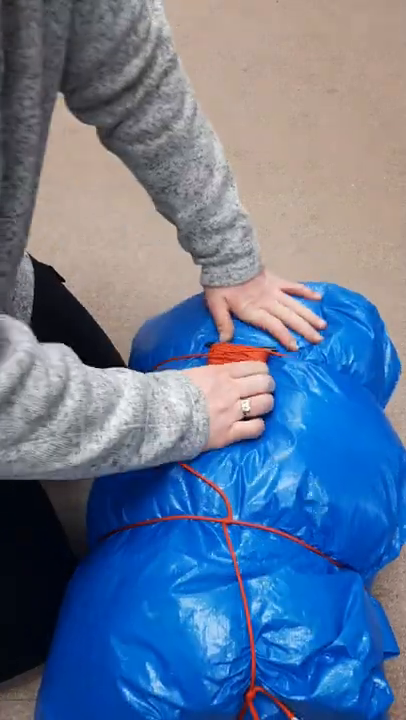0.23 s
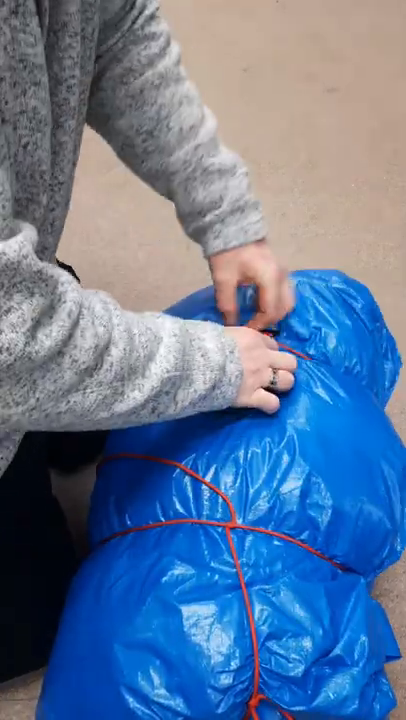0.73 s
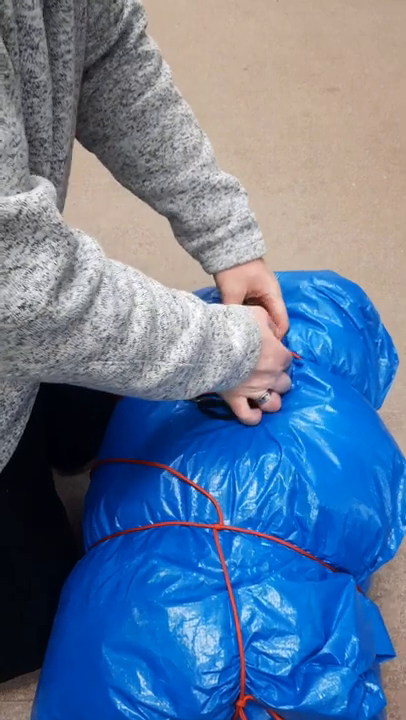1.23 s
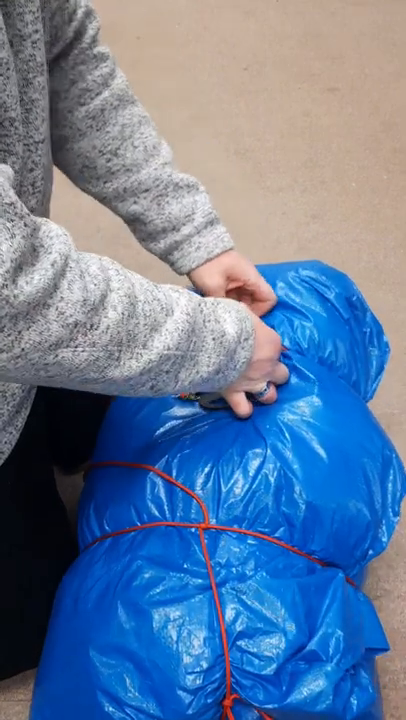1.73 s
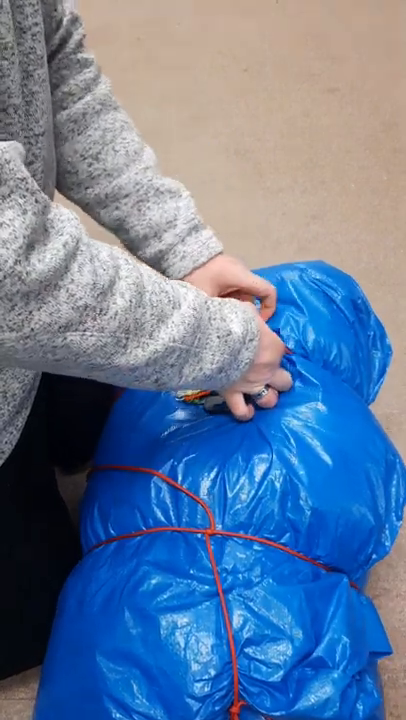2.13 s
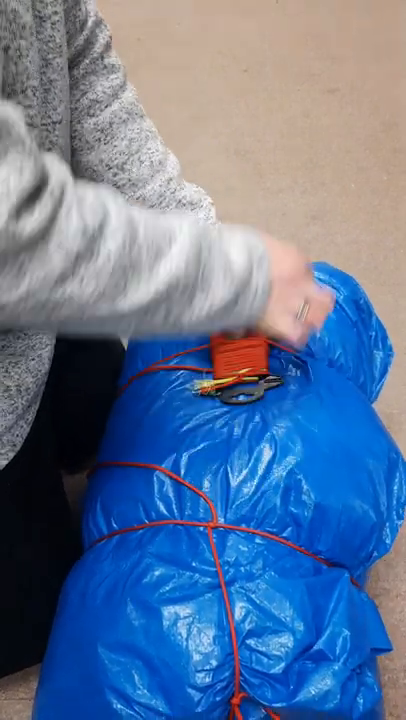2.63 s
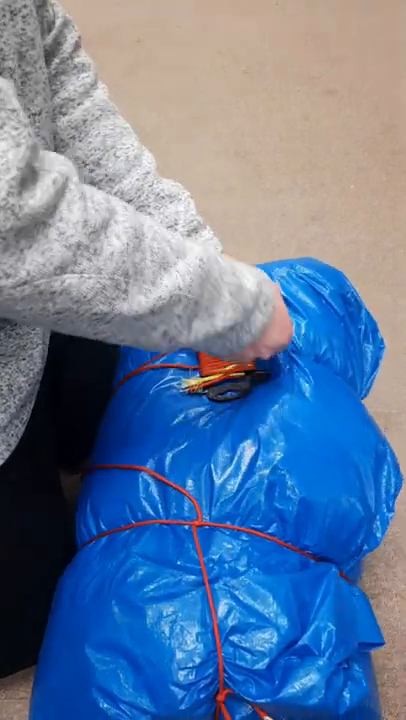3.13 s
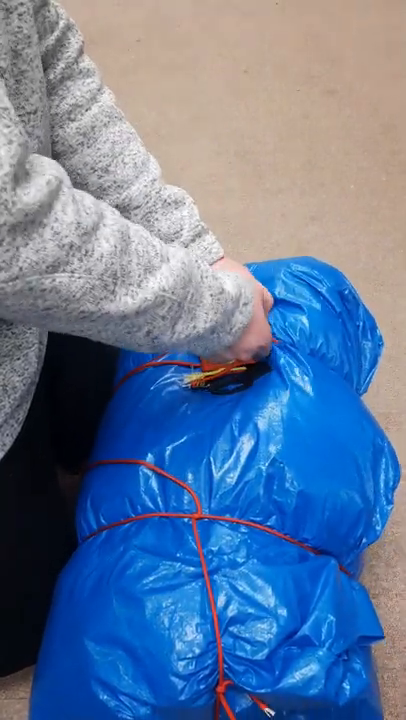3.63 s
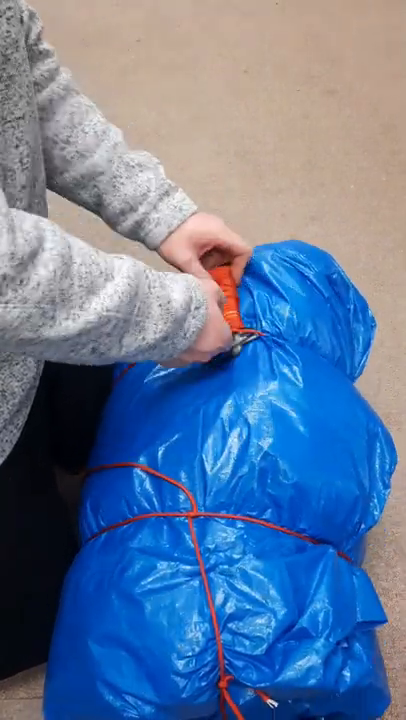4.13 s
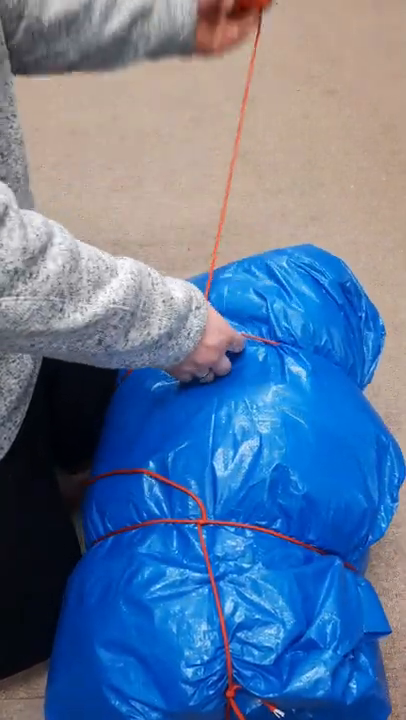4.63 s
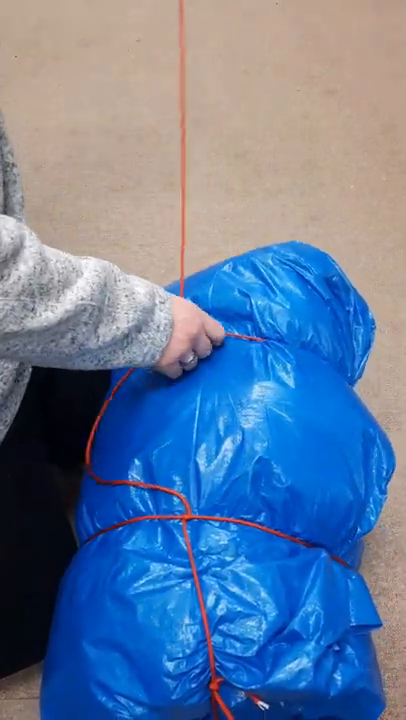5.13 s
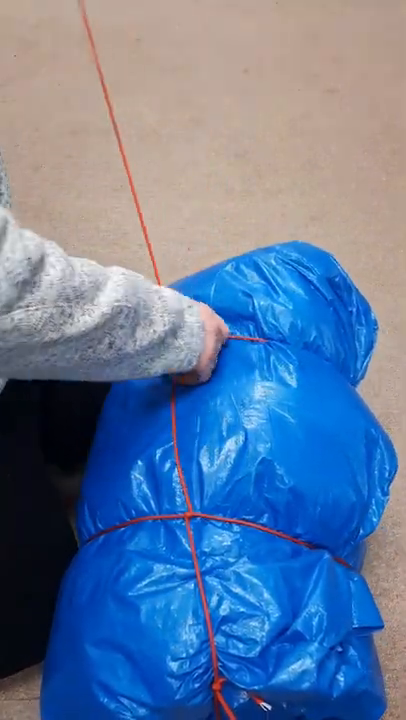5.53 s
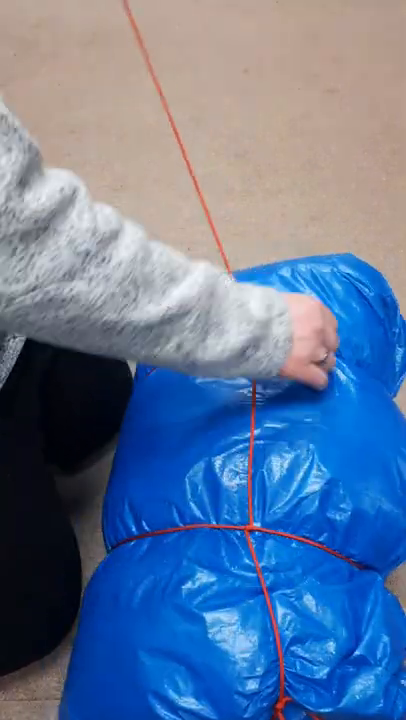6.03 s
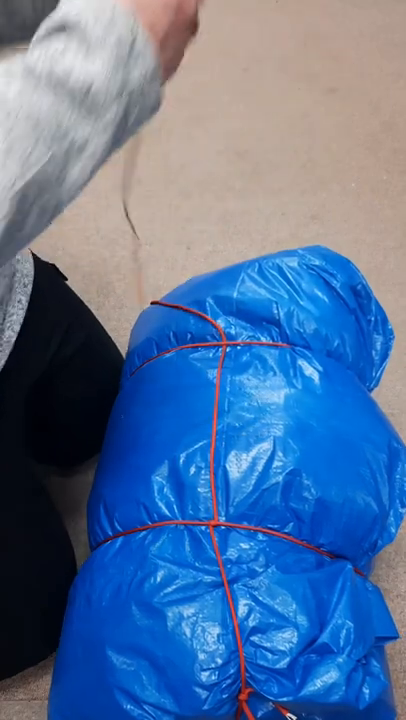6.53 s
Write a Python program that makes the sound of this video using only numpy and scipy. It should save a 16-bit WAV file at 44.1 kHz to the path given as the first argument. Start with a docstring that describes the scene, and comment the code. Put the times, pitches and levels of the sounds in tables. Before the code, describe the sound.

A quiet, slightly reverberant room with low, steady ventilation rumble. Very close, a little left, plastic tarp crackles at once, brisk and dense until about 0.4 s, with sharp crease snaps. Rustling continues in short bursts from 0.5 to 1.5 s, with small dull knocks near 0.7 and 1.0, then grows lighter. A crisp snap comes at 1.7, more crinkles follow, and a heavy, hollow, slack-drum thump booms at 2.6. Sparse, softer crackles run from 2.9 to 4.0. At 4.1-4.2 three fast, loud slapping thumps and snaps hit, the rumble dipping slightly afterwards. Cord then slides from 4.3, hissing with a breathy whistle that rises, peaks around 4.55, drops and wavers, fading by 5.3. Faint hiss lingers to 5.9, with tiny clicks, a soft thump and crinkle at 6.0, near quiet, and a light tap at 6.7.

```python
"""Quiet room, two microphone ports close to a stuffed bundle of plastic tarp on the floor, the left one nearer.
From the start hands tie a cord round it: the sheet crackles in clumps of tiny clicks and snaps at its creases.
A cord winder and the jerking cord thump it like a slack drum, its modes ringing, loudest past two and four seconds.
Then the cord slides out through a loop with a hiss and a noisy whistle; a few small moves and blows follow.
Ventilation, a shaped noise, rumbles below throughout; the recorder's gain control turns it down after loud blows."""
import sys
import numpy as np
from scipy import signal
from scipy.fft import rfft, irfft, next_fast_len
from scipy.io import wavfile
from scipy.ndimage import uniform_filter1d, map_coordinates

SR = 44100
rng = np.random.default_rng(int(sys.argv[2]) if len(sys.argv) > 2 else 0)


def put_to_file(sound):
    """Save the sound as 16-bit audio at rate SR, in the file named by the first command-line argument."""
    columns = np.atleast_2d(sound).T  # one column per channel
    safe = np.clip(columns, -1, 1)
    whole_steps = np.round(safe * 32767)
    wavfile.write(sys.argv[1], SR, whole_steps.astype(np.int16))


N = 298541


def from_db(db):
    """dB to gain."""
    return 10 ** (np.asarray(db) / 20)


def rms_one(x):
    """Scaled to rms 1."""
    return x / np.sqrt(np.mean(x ** 2) + 1e-20)


def in_time(rows):
    """Curve columns read at every sample."""
    s, *columns = np.vstack(rows).T
    return [np.interp(np.arange(N) / SR, s, c) for c in columns]


def at_hz(points, hz):
    """Spectrum read on a log-frequency axis."""
    point_hz, value = np.array(points).T
    return np.interp(np.log(hz), np.log(point_hz), value)


def butter(order, hz, kind, x):
    """Low- or high-pass with a maximally flat passband."""
    return signal.sosfilt(signal.butter(order, hz, kind, fs=SR, output="sos"), x)


def drift(rate_hz):
    """Slow random wander of spread 1, drawn at every 40th sample."""
    r = np.exp(-80 * np.pi * rate_hz / SR)
    noise = rng.standard_normal(N // 40 + 2002)
    slow = signal.lfilter([1], [1, -2 * r, r * r], noise)[2000:]      # the filter has settled by then
    return np.interp(np.arange(N) / 40, np.arange(len(slow)), rms_one(slow))


def resonance(x, hz, width_hz):
    """Two-pole peak, gain 1 on top."""
    r = np.exp(-np.pi * width_hz / SR)
    zeros = np.array([1, 0, -1]) * (1 - r * r) / 2
    return signal.lfilter(zeros, [1, -2 * r * np.cos(2 * np.pi * hz / SR), r * r], x)


def ring(force, hz, t60):
    """A unit click sets a sine of height 1 ringing."""
    r, w = from_db(-60 / (t60 * SR)), 2 * np.pi * hz / SR
    return signal.lfilter([0, np.sin(w)], [1, -2 * r * np.cos(w), r * r], force + 1e-18)


# Moves of the hands on the sheet, close to the ports. Each row: start in seconds, length in seconds,
# nominal crackle level in dB, swell over the move in dB, then crispness, pressure on the bundle and treble,
# each in dB relative to the crackle.
HAND_MOVES = [(0.0, 0.0061, -50, -2, -3.5, 3, -3), (0.05, 0.13, -37.5, 2, -3.5, -7, -13),
              (0.229, 0.18, -40, -9, -4, -0.5, -12), (0.525, .2, -49, 6.5, -5.5, 2, -10.5),
              (0.797, 0.28, -44.5, -13, -4.5, -2, -12), (1.06, 0.026, -40, -6.5, -6.5, -8, -11),
              (1.12, .08, -47.5, -5, -3.5, -1, -17), (1.19, 0.28, -53, -2.5, -7, -0.5, -13.5),
              (1.513, 0.066, -56.5, -3, -2.5, 7.5, -4), (1.638, .1, -53.5, -0.5, -5.5, 1, -9),
              (1.76, 0.11, -52, 4.5, -9.5, -4, -7.5), (1.935, 0.082, -55, -1, -7, 8.5, -10.5),
              (2.032, 0.0095, -48, -1, -33, 7.5, -22), (2.068, .11, -53, 2, -13, 0.5, -18),
              (2.206, 0.035, -50, 2.5, -4.5, 2.5, -10), (2.309, 0.31, -54, 10.5, -3.5, 3, -8.5),
              (2.909, 0.055, -58, 8.5, -5.5, -3, -6), (3.058, 0.011, -46, -13.5, -3, -1, -10),
              (3.105, 0.012, -40, -17, -1, -8, -2.5), (3.23, 0.028, -51, -12, -2, -13, -13),
              (3.341, 0.1, -71, 8, -7.5, -2, -16), (3.492, 0.15, -61, 8.5, -8, -0.5, -16),
              (3.691, 0.14, -68.5, 0.5, -5, 9, -8), (3.835, 0.015, -47, 1, -4, -6, -14),
              (3.82, 0.21, -53, -1.5, -3.5, -1, -9), (4.079, 0.084, -47.5, 2.5, 0, -10.5, -4),
              (4.214, .1, -39, -4, -4, 2, -6), (4.35, 0.048, -41, -6.5, -8.5, 2, -5),
              (5.44, 0.055, -71, 1.5, 5, 17, 1), (5.612, 0.17, -61.5, 1.5, 1.5, 7, -6),
              (5.906, 0.071, -70, 16.5, 8.5, 13, 3), (6.005, 0.016, -48.5, -1, 0, 11, 1.5),
              (6.082, 0.053, -64.5, -7, -6, 4, -5), (6.612, .08, -73, 3, 0.5, 17, 6),
              (6.697, 0.05, -48, -12.5, -2.5, -11, -5)]
# The cord sliding over the sheet. Each row: time in seconds, nominal hiss level in dB.
CORD_SLIDE = [(4.3, -57), (4.44, -47.5), (4.56, -52), (4.66, -54), (4.8, -60.5), (4.87, -56.5),
              (5.1, -56.5), (5.3, -63), (5.5, -59), (5.6, -62), (5.78, -65.5), (5.88, -69)]
# The sheet under the sliding cord, and at rest. Each holds: crispness, treble and pressure in dB relative
# to the crackle, smooth share from 0 to 1.
UNDER_CORD = (2, -4, 1, 0.73)
AT_REST = (-0.5, 1.5, 20, 0.9)
REST_DB = -79
ATTACK_SHARE = 0.34   # a move swells in over this share of its length, half of it before the start
MOVE_RELEASE_DB_PER_S, MOVE_SMOOTH = 301, 0.22   # fade after a move; smooth share 0-1


def handling():
    """Moves, sliding cord and resting sheet add in power: crackle, crispness, treble, smooth share, pressure."""
    t = np.arange(N) / SR
    powers = 0
    for s, length, db, swell_db, crisp_db, press_db, treble_db in HAND_MOVES:
        swell = swell_db * np.clip((t - s) / length, 0, 1)
        release = MOVE_RELEASE_DB_PER_S * np.maximum(t - s - length, 0)
        attack = np.clip((t - s) / (ATTACK_SHARE * length) + 0.5, 0, 1)
        power = (attack * from_db(db + swell - release)) ** 2
        shares = [1, *from_db([crisp_db, treble_db, press_db]) ** 2, MOVE_SMOOTH]
        powers = powers + np.outer(shares, power)
    first, last = CORD_SLIDE[0][0], CORD_SLIDE[-1][0]
    on = np.interp(t, [first - 0.06, first, last, last + 0.06], [0, 1, 1, 0])
    sliding_gain = on * from_db(*in_time(CORD_SLIDE))
    resting_gain = from_db(REST_DB) * np.ones(N)
    for gain, (*rel_db, smooth) in ((sliding_gain, UNDER_CORD), (resting_gain, AT_REST)):
        powers = powers + np.outer([1, *from_db(rel_db) ** 2, smooth], gain ** 2)
    level_db, crisp_db, treble_db, pressure_db = 10 * np.log10(powers[:4])
    smooth_share = powers[4] / powers[0]
    return level_db, crisp_db - level_db, treble_db - level_db, smooth_share, pressure_db


# Colour of the tarp heard close by, relative within each of three bands (up to 2800, to 7500, above).
# Each row: frequency in Hz, weight in dB.
TARP_COLOUR = [(290, -31), (500, 7), (621, 9), (688, 1), (906, 6.5), (1030, 4.5), (2810, -0.5), (4530, 4.5),
               (9360, -64), (15100, -33), (16000, -32)]
GRAINS_PER_S = 1200   # nominal; the clumps thicken and thin it


def crackle(level_db, crisp_db, treble_db, sliding):
    """Tiny creases click in clumps over a sliding hiss; each patch of sheet has its pitch, each click its place."""
    sizes = from_db(2.34 * np.minimum(rng.exponential(1, N), 3.3)) * rng.choice([-1, 1], N)
    clumps = drift(30)
    struck = rng.random(N) < GRAINS_PER_S * from_db(4.0 * clumps) / SR
    clicks = rms_one(sizes * struck)
    pitches = np.geomspace(500, 15000, 14)
    dealt = rng.integers(0, len(pitches), N)      # which patch each click falls on
    hiss = rng.standard_normal((4, N)) * from_db(1.6 * clumps)
    smooth = np.clip(sliding, 0, 1)
    clicks = np.sqrt(len(pitches) * (1 - smooth)) * clicks
    hiss = np.sqrt(smooth) * hiss
    place, bands = rng.choice([-1, 1], N), np.zeros((3, 2, N))
    for k, hz in enumerate(pitches):
        wide = np.clip(0.45 * (hz / 4000) ** 0.61, 0, 0.9)      # short waves reach the two ports less alike
        own = clicks * (dealt == k) * min(1, (3500 / hz) ** 0.77)      # the treble is more slide than click
        both = own + hiss[k % 2]
        apart = own * place + hiss[2 + k % 2]
        stereo = np.sqrt(1 - wide) * both + np.sqrt(wide) * apart * [[1], [-1]]
        patch = resonance(stereo, hz, 0.32 * hz)
        # steeper skirts: a small crease sounds in a narrow band
        patch = resonance(patch, hz, min(2.4 * hz, 9000))
        bands[np.searchsorted([2800, 7500], hz)] += from_db(at_hz(TARP_COLOUR, hz)) * patch
    crisp = butter(1, 2000, "high", bands[1])
    top = butter(2, 6000, "high", bands[2])
    thin_creases = from_db(crisp_db + 5.5) * rms_one(crisp) + from_db(treble_db + 4) * rms_one(top)
    return from_db(level_db - 2.5) * (1.86 * rms_one(bands[0]) + thin_creases)


# Single creases snapping over, close to the ports. Each row: time in seconds, peak of the body in dB
# before panning, centre in Hz, bright edge in dB relative to the body's peak.
CREASE_SNAPS = [(0.0593, -18.5, 1610, -24), (0.0665, -21, 3540, -28), (0.086, -17, 1750, -17),
                (0.114, -19.5, 1930, -14), (0.171, -20.5, 1710, -11), (0.1987, -23, 2930, -24),
                (0.2633, -39, 3690, -13), (0.2926, -30, 1530, -20), (0.3152, -29, 1680, -13),
                (0.4277, -30.5, 2030, -27), (0.5495, -34, 1890, -18), (0.6856, -33, 2230, -12),
                (0.71, -29, 1750, -12), (0.8257, -32, 2410, -14), (0.845, -29, 3500, -17),
                (0.865, -31, 1400, -20), (0.9095, -31.5, 2300, -20), (1.0678, -30.5, 1750, -15),
                (1.0868, -23, 2740, -20), (1.1275, -31, 2740, -20), (1.1893, -36, 4750, -14),
                (1.3188, -32, 1550, -23), (1.4271, -38.5, 2000, -21), (1.5163, -41.5, 1500, -8),
                (1.5299, -34, 8160, -10), (1.562, -32, 5740, -13), (1.643, -37, 3150, -15),
                (1.6658, -29.5, 2440, -22), (1.7158, -18, 2480, -25), (1.734, -27, 2050, -24),
                (1.777, -30, 1690, -16), (1.82, -26, 3900, -12), (1.904, -28, 4900, -11),
                (2.0336, -32, 1470, -21), (2.077, -47, 1280, -28), (2.13, -40, 1280, -18),
                (2.2228, -36.5, 2500, -19), (2.3087, -40, 2220, -20), (2.362, -43, 3110, -17),
                (2.4, -40, 1560, -7), (2.4326, -25, 2490, -19), (2.4699, -31, 2710, -12),
                (2.5052, -33, 1760, -16), (2.5717, -45, 1900, -6), (2.615, -17, 1430, -26),
                (2.9017, -46, 1580, -16), (2.972, -33.5, 2430, -22), (3.045, -32.5, 2200, -22),
                (3.0909, -41, 1680, -3), (3.106, -29.5, 1780, -18), (3.2312, -35, 2250, -14),
                (3.3397, -47, 1530, -21), (3.616, -45, 1690, -14), (3.6243, -38, 1330, -12),
                (3.642, -35.5, 6500, -3), (3.814, -41, 2190, -12), (3.839, -31, 2200, -18),
                (3.8763, -35, 4300, -17), (3.902, -29.5, 3900, -11), (3.9872, -40, 2120, -19),
                (4.0808, -28, 1500, -16), (4.148, -13.5, 1350, -20), (4.2208, -9.5, 1890, -26),
                (5.3779, -27.5, 4070, -21), (5.4635, -33, 5200, -10), (5.487, -37, 3500, -20),
                (5.937, -37, 5070, -5), (5.9752, -26, 4470, -16), (6.0139, -27.5, 3100, -18),
                (6.097, -41, 1590, -21), (6.694, -47, 4210, -18)]
SNAP_PAN_DB, SNAP_SCATTER_DB = 4.5, 3   # left over right, and its spread


def snaps():
    """A sharp click coloured by the crease with a bright edge, then a short noisy tail."""
    length = 2000
    out, t = np.zeros((2, N + length)), np.arange(length) / SR
    tails = rng.standard_normal((len(CREASE_SNAPS), 2, length))
    pans_db = SNAP_PAN_DB + SNAP_SCATTER_DB * tails[:, 0, 0]
    for (s, db, hz, edge_db), noise, pan_db in zip(CREASE_SNAPS, tails, pans_db):
        force = 0.13 * noise * from_db(-60 * t / 0.025)
        force[:, 0] = 1
        body = resonance(resonance(force, hz, 0.65 * hz), hz, 1.8 * hz)
        edge = butter(2, 5000, "high", force * from_db(-60 * t / 0.0081))
        snap = body / np.abs(body).max() + from_db(edge_db) * edge
        at = round(s * SR)
        out[:, at:at + length] += snap * from_db(db + pan_db / 2 * np.array([[1], [-1]]))
    return out[:, :N]


# Blows on the bundle, close to the ports. Each row: time in seconds, nominal slap in dB, nominal thump in dB,
# lowest modes in dB relative to the thump, upper modes in dB relative to the thump.
BUNDLE_BLOWS = [(0.685, -24, -35.5, 4, 9.5), (1.006, -21.5, -28.5, -31, 9), (1.089, -22, -31.5, -22, -21),
                (1.904, -42, -32.5, -26, 8), (2.399, -19, -40.5, -15, 14), (2.615, -18, -3, -2, 2.5),
                (2.731, -62, -20, -2, -18), (3.106, -51, -42.5, -8, -1), (3.835, -29, -40.5, -4.5, 13),
                (4.0804, -16.5, -15, -9.5, 3), (4.147, -8, -11, -12.5, 3.5), (4.2193, -5, -7, -10.5, 0.5),
                (5.644, -59, -34.5, -16, 0), (6.013, -24.5, -25.5, 1.5, -18), (6.099, -36, -39.5, 3, -6),
                (6.695, -36.5, -39.5, -23, 18.5)]
# Modes of the bundle and the air in it. Each row: frequency in Hz, relative level in dB,
# time to fall 60 dB after a blow in seconds.
BUNDLE_MODES = [(84, -8.5, 0.16), (115, -0.5, 0.096), (152.8, -11.5, 0.38), (195, -1.5, 0.15),
                (260.3, -16, 0.36), (321.8, 0, 0.14), (357.3, -12.5, 0.24), (395.3, -5.5, 0.12),
                (428.3, -11.5, 0.15), (499, -8.5, 0.074), (557, -18, 0.13), (655, -23, 0.16),
                (768, -26, 0.11)]
HARDNESS_HZ = 520   # a push lasts half a cycle of this


def bundle(pressure_db):
    """Blows (half-sine pushes) and kneading noise ring the modes; each blow also slaps the sheet."""
    count, t = len(BUNDLE_MODES), np.arange(8000) / SR
    force, slap = np.zeros((count, N)), np.zeros(N)
    mode_hz = np.array(BUNDLE_MODES)[:, :1]
    lowest, upper = mode_hz < 180, mode_hz > 340
    settle = rng.standard_normal((count, len(t)))
    spots_db = 2.2 * rng.standard_normal((len(BUNDLE_BLOWS), count, 1))      # where it lands weights the modes
    push = np.sin(np.linspace(0, np.pi, int(SR / HARDNESS_HZ / 2)))
    for (s, slap_db, db, low_db, upper_db), spot_db in zip(BUNDLE_BLOWS, spots_db):
        # the sheet slaps first, the stuffing gives way after
        at, sunk = round(s * SR), round((s + 0.0015) * SR)
        weight_db = db - 4 + spot_db + upper_db * upper
        # the stuffing settles noisily for a moment, which blurs the modes
        settling = from_db(weight_db + low_db * lowest - 39.5 - 60 * t / 0.18) * settle
        force[:, sunk:sunk + len(t)] += settling[:, :N - sunk]
        # the whole bundle swells while its skin dents: the lowest modes start in opposite phase
        direction = np.where(lowest, from_db(low_db), -1)
        force[:, sunk:sunk + len(push)] += direction * from_db(weight_db) * push / push.sum()
        slap_fade = from_db(slap_db - 60 * t / 0.0084) + from_db(slap_db - 12 - 60 * t / 0.099)
        slap[at:at + len(t)] += slap_fade[:N - at]
    knead = from_db(pressure_db - 19.5 + 2.86 * drift(31.5)) * rng.standard_normal(N)
    out = from_db(7.0) * resonance(resonance(slap * rng.standard_normal(N), 870, 580), 490, 1000)
    for k, (hz, db, t60) in enumerate(BUNDLE_MODES):
        out += from_db(db) * ring(force[k], hz, t60)
        # resting hands damp the modes
        out += from_db(db) * (-1) ** k * ring(knead * ~lowest[k], hz, 0.3 * t60)
    return out


# Cord running through its loop, close by. Each row: time in seconds, whistle pitch in Hz,
# nominal whistle level in dB.
CORD_WHISTLE = [(4.38, 1063, -48), (4.438, 1302, -47.5), (4.55, 1294, -41.5), (4.632, 1002, -53),
                (4.804, 897, -56), (4.874, 1205, -52), (4.96, 988, -55), (5.2, 956, -67), (5.3, 975, -93)]
# Steady rub resonance of the cord: centre in Hz, width in Hz, level in dB relative to the whistle.
RUB_RESONANCE = (5860, 720, -10)


def cord():
    """Rub noise in a gliding resonance and its octave, with a steady one above."""
    hz, db = in_time(CORD_WHISTLE)
    first, last = CORD_WHISTLE[0][0], CORD_WHISTLE[-1][0]
    on = np.interp(np.arange(N) / SR, [first - 0.05, first, last, last + 0.13], [0, 1, 1, 0])
    slow = butter(2, 75, "low", rng.standard_normal((4, N)))
    turn = 2 * np.pi * np.cumsum(hz) / SR      # two slow noises in quadrature make a noise band round the pitch
    whistle = rms_one(slow[0] * np.cos(turn) + slow[1] * np.sin(turn))
    octave_db = -9 + 0.5 * (db - db.max())      # a harder pull brings out the octave
    octave = from_db(octave_db) * rms_one(slow[2] * np.cos(2 * turn) + slow[3] * np.sin(2 * turn))
    rub_hz, rub_width_hz, rub_db = RUB_RESONANCE
    rub = from_db(rub_db) * rms_one(resonance(rng.standard_normal(N), rub_hz, rub_width_hz))
    return on * from_db(db - 1.5 + 1.5 * drift(21)) * (whistle + octave + rub)


ROOM_T60_S, ROOM_TREBLE_T60_S, WALL_CUT_HZ = 0.39, 0.4, 2800


def room(x):
    """Dense echoes that die away, bass and treble nearly together; long waves reach both ports alike."""
    t = np.arange(SR // 2) / SR
    echoes = rng.standard_normal((2, len(t))) * (t > 0.004)
    dull = butter(1, WALL_CUT_HZ, "low", echoes)
    echoes = dull * from_db(-60 * t / ROOM_T60_S) + (echoes - dull) * from_db(-60 * t / ROOM_TREBLE_T60_S)
    apart = butter(1, 350, "high", echoes[1] - echoes[0])
    echoes[1] = echoes[0] + apart
    echoes = butter(2, 300, "high", echoes)      # the echoes are thin, without deep bass
    return signal.fftconvolve(x[None], echoes / np.sqrt(np.sum(echoes[0] ** 2)), axes=1)[:, :N]


# Colour of the ventilation across the room. Each row: frequency in Hz, relative density in dB per Hz.
AIR_COLOUR = [(15, -62.5), (25, -34), (30, -50.5), (42, -9), (123, -1.5), (206, -16.5), (242, -8),
              (293, -26.5), (373, -11), (476, -21.5), (531, -27), (863, -45.5), (5730, -54), (8140, -47),
              (16000, -82.5)]
# How alike the room noise is at the two ports. Each row: frequency in Hz, likeness from 0 to 1.
PORT_LIKENESS = [(60, 1), (240, 0.64), (950, 0.084), (3770, 0.09), (15000, 0.03)]
AIR_DB = -47   # rms over both ports, before the gain control


def ventilation():
    """Steady stereo noise, alike in the bass."""
    size = next_fast_len(N)
    hz = np.arange(1, size // 2 + 2) * SR / size
    alike = np.clip(at_hz(PORT_LIKENESS, hz), -1, 1)
    mid, side = rfft(rng.standard_normal((2, size))) * from_db(at_hz(AIR_COLOUR, hz))
    both = np.sqrt(1 + alike) * mid + np.sqrt(1 - alike) * side * [[1], [-1]]
    return from_db(AIR_DB) * rms_one(irfft(both, size)[:, :N])


def gain_control(near):
    """Gain for the rumble: the recorder's gain control turns it down after loud blows and lets it back slowly."""
    t = np.arange(N) / SR
    level_db = 10 * np.log10(uniform_filter1d(near ** 2, 441) + 1e-12)
    excess_db = np.maximum(0.42 * (level_db + 19.0), 0)
    # a peak hold that comes back by 2.64 dB a second; the small difference of slopes deepens it slowly
    held_db = np.maximum.accumulate(excess_db + 2.76 * t) - 2.64 * t
    pole = np.exp(-1 / (0.054 * SR))
    return from_db(-signal.lfilter([1 - pole], [1, -pole], np.maximum(held_db, 0)))


RIGHT_LAG_S, RIGHT_TREBLE_DB = 5e-5, -5.5


def scene():
    """The bundle lies nearer the left port: the right one hears it later and shaded."""
    *sheet, pressure_db = handling()
    left, right = crackle(*sheet) + bundle(pressure_db) + cord()
    dull = butter(1, 250, "low", right)      # the bass bends round unshaded
    right = dull + from_db(RIGHT_TREBLE_DB) * (right - dull)
    near = np.array([left, right]) + snaps()
    near[1] = map_coordinates(near[1], [np.arange(N) - RIGHT_LAG_S * SR], order=3)
    return near + from_db(-6.5) * room(near.mean(0)) + gain_control(near[0]) * ventilation()


CEILING, CUTOFF_HZ = 0.96, 16500   # full scale is 1; stopband edge


def record(dry):
    """The microphones lose the deep bass; the highest peaks are rounded, the top is cut."""
    thin = butter(3, 48, "high", dry)
    rounded = thin / (1 + (thin / CEILING) ** 8) ** 0.125
    return signal.sosfilt(signal.cheby2(14, 70, CUTOFF_HZ, fs=SR, output="sos"), rounded)


dry = scene()
out = record(dry)
put_to_file(out)
```